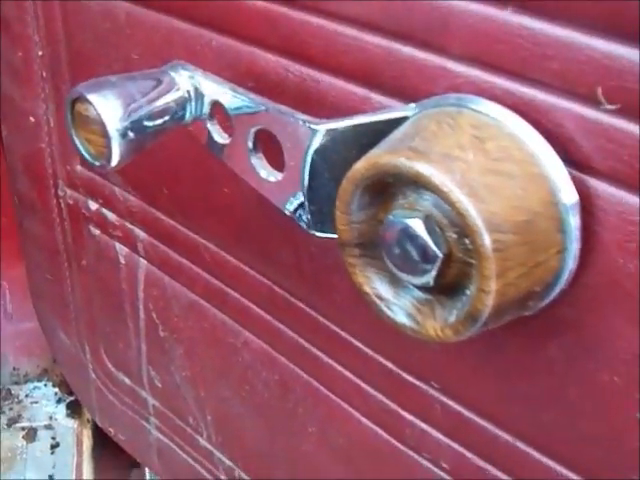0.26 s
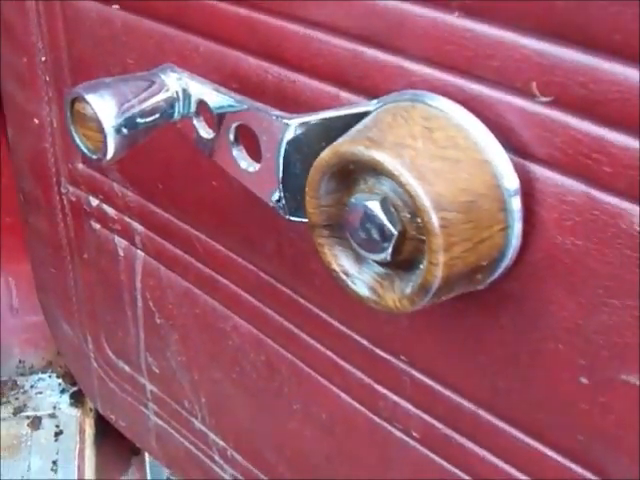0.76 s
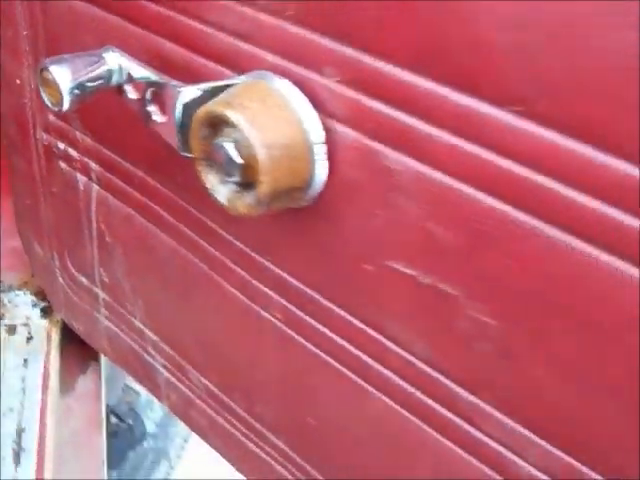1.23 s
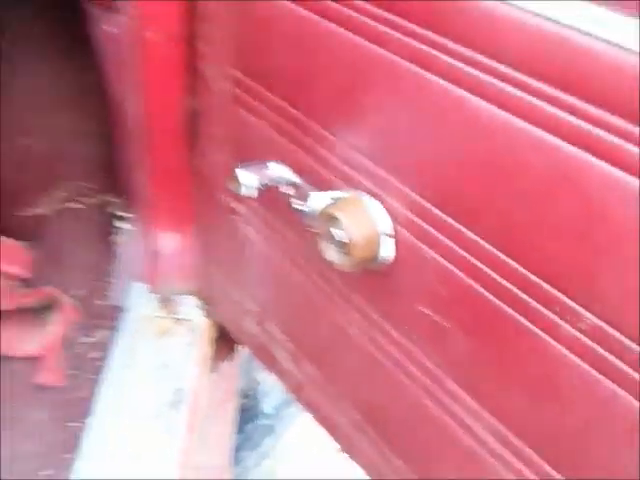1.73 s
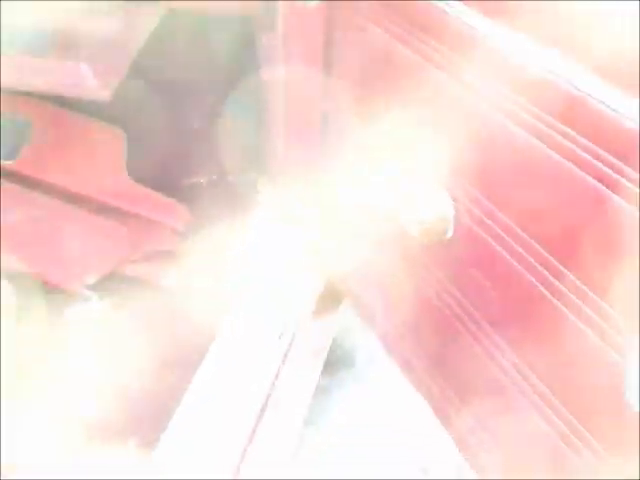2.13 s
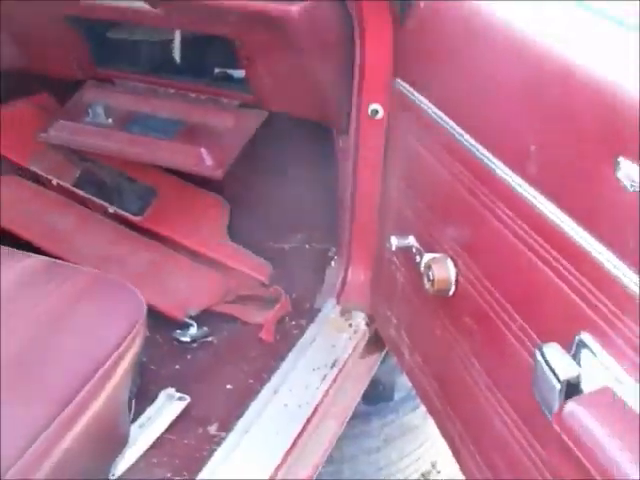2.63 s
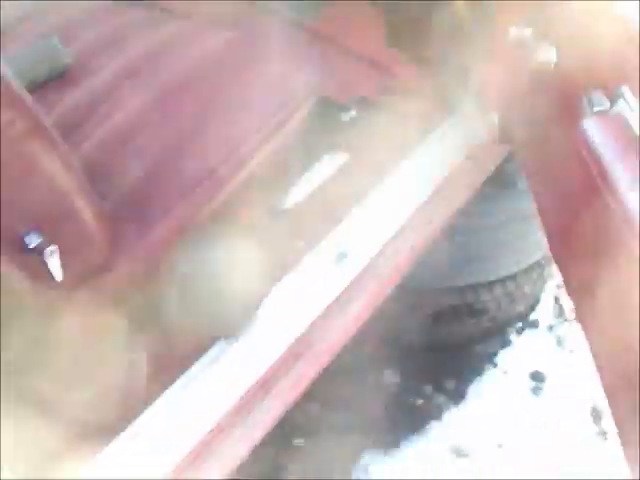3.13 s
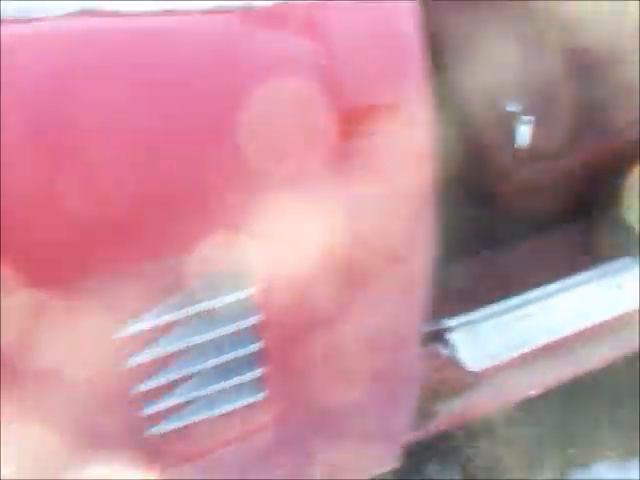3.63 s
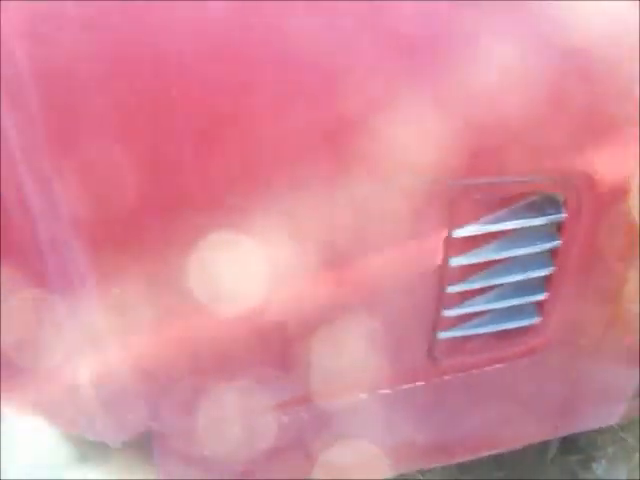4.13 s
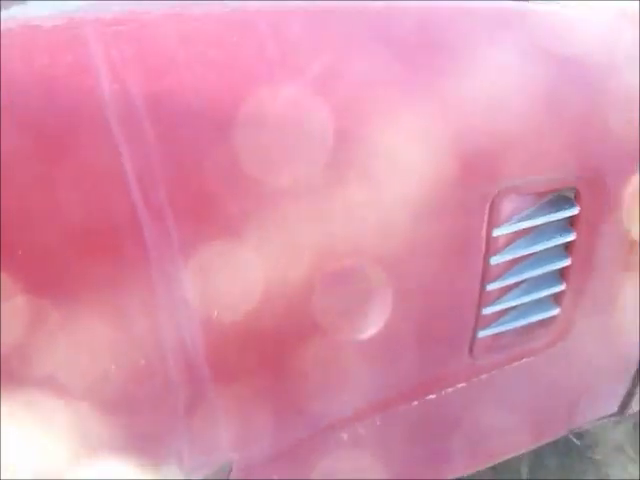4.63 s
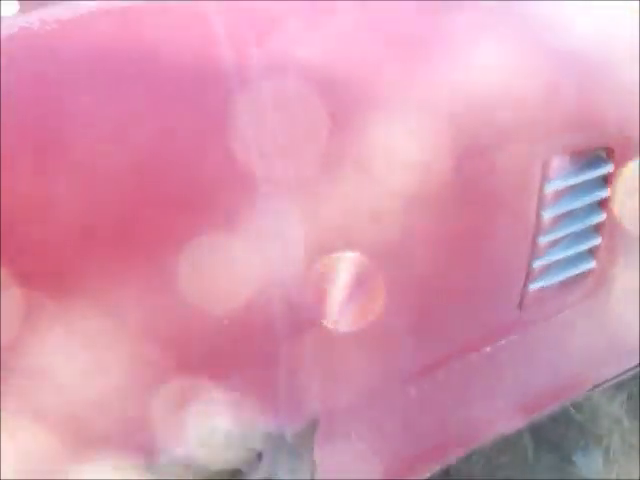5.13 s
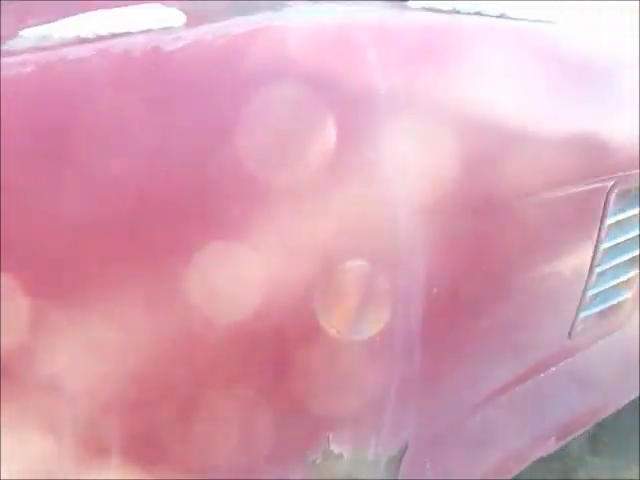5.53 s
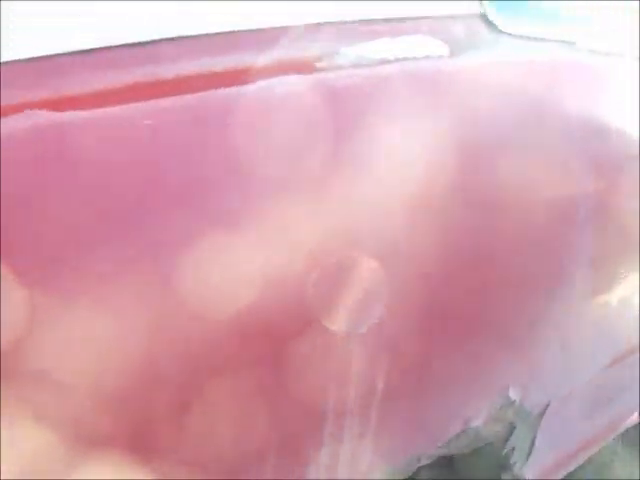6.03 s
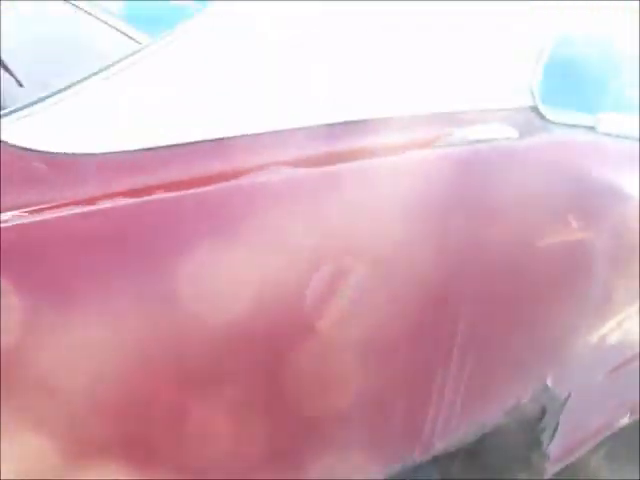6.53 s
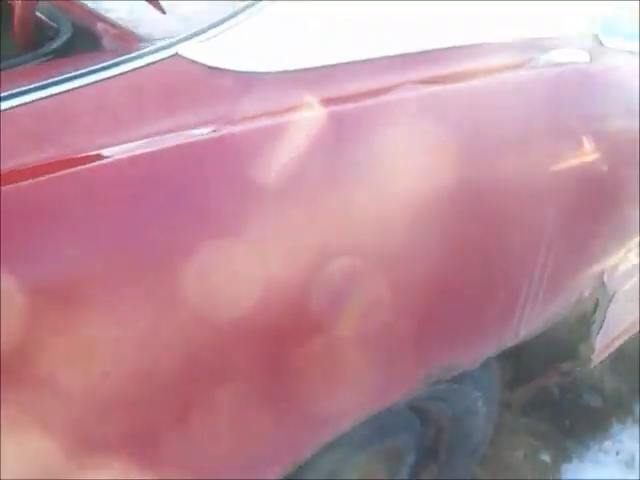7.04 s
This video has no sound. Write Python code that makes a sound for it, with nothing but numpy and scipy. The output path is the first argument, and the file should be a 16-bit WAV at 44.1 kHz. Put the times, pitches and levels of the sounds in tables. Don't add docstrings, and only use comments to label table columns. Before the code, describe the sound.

Close handling rumble and soft knuckle raps, then a sharp latch crack and two heavy metallic door clunks, then grass rustle, ticks and thuds.

```python
import sys
import numpy as np
from scipy import signal
from scipy.fft import rfft, irfft
from scipy.io import wavfile
from scipy.ndimage import uniform_filter1d

SR = 44100
rng = np.random.default_rng(int(sys.argv[2]) if len(sys.argv) > 2 else 0)


def boost(x):
    u = np.asarray(x, float) / 20
    return 10 ** u


def generate_wav(signal):
    frames = np.transpose(np.atleast_2d(signal))
    scaled = np.clip(frames, -1, 1) * 32767
    pcm = np.round(scaled).astype(np.int16)
    wavfile.write(sys.argv[1], SR, pcm)


N = 320882
TIME = np.arange(N) / SR

# f/Hz, level/dB, t60/s
LATCH_MODES = [(337, 4.5, 0.121), (505, -14, .08), (680.5, 5.5, 0.15), (937, -4, 0.11), (988, 10.5, 0.069),
               (1190, -12, 0.078), (1267.6, -5.5, 0.12), (1336, -16, 0.057), (1460, -3, 0.099),
               (1556, -6, 0.1), (1765, 1.5, 0.08), (3380, -7.5, 0.052), (5140, -8, 0.069),
               (8660, -13, 0.032)]
EDGE_MODES = [(95.3, -13, 0.26), (222.4, -17.5, 0.27), (337.8, 8, 0.11), (367.2, -12, 0.22),
              (333, -10, 0.36), (416, -13, 0.29), (491, -9.5, 0.15), (676, -37, 0.094), (870, -10, 0.11),
              (1080, -7.5, .08), (1298, -3.5, 0.041), (1650, -6.5, 0.077), (1900, -35, .05),
              (2380, -31, 0.075)]
SEAT_MODES = [(100.4, -6.5, 0.345), (250, -14, 0.13), (289.4, -8.5, 0.097), (337, -13, 0.182),
              (624, -0.5, 0.082), (862, -5, 0.14), (1002, 4.5, 0.06), (1430, -9.5, 0.082),
              (1724, -9, 0.077), (1879, -14, 0.07), (3270, -8, 0.066), (3840, -7, 0.066)]
# f/Hz, spectral level/dB per Hz
CRACK_SPECTRA = [
    [(100, -21), (300, -15), (900, -9), (1500, -12), (2400, -23.5), (5500, -18.5), (8000, -24),
     (13800, -24.5), (15500, -39)],
    [(100, -6), (250, -5), (500, -6), (1100, -7.5), (1700, -18.5), (3400, -18), (6000, -31), (13000, -45),
     (15500, -60.5)],
    [(100, -8.5), (300, -8), (700, -11.5), (1500, -17), (3700, -16), (8600, -24), (12500, -19),
     (14300, -16.5), (15500, -31)],
]
# t/s, ring level/dB, crack level/dB, contact time/s, crack t60/s
LATCH_BLOWS = [
    (3.7272, -17, -11.5, 0.0027, 0.088),
    (3.7515, -25, -26, 0.00086, 0.027),
]
EDGE_BLOWS = [
    (3.9084, -27.5, -23.5, 0.00306, 0.028),
    (3.9124, -13.5, -15, 0.00042, 0.07),
    (3.934, -28.5, -34, .002, 0.03),
    (3.974, -34, -49, 0.005, 0.065),
    (4.523, -31, -41, .003, .03),
    (4.538, -24.5, -38, 0.004, .03),
    (4.701, -49, -44, 0.0036, 0.04),
]
SEAT_BLOWS = [(4.5003, -26.5, -23.5, 0.00089, 0.024), (4.5027, -17, -16, 0.001, 0.04),
              (4.512, -28, -20, .002, .03), (4.527, -24.5, -15.5, 0.0028, 0.035),
              (4.533, -28, -18, 0.0013, 0.034), (4.555, -34, -40, .003, .05),
              (4.568, -38, -29, 0.003, 0.07), (4.579, -41, -31.5, 0.0019, 0.074),
              (4.591, -41, -27, 0.0014, 0.029), (4.607, -47, -45.5, .003, 0.04),
              (4.628, -38.5, -44, 0.0016, 0.05), (4.65, -48, -45, .002, 0.055)]
DAMPING_SLOPES = (0.39, 0.43, 0.35)
BLOOMS = (.6, .1, .3)
OCTAVE_EDGES = (60, 250, 500, 1000, 2000, 4000, 8000, 16000)
# t/s, f/Hz, level/dB, t60/s
HINGE_SWAY = [
    (4.7, 24, -28, 0.71),
    (7.1, 45, -44, 0.42),
    (3.9, 38, -32, 0.73),
]
# t/s, gain level/dB
LIMITER_GAIN = [(0, 0), (3.744, 0), (3.748, -3), (3.88, -3), (3.9, 0.5), (3.944, 0), (3.95, -3), (4.3, -2),
                (4.4, 0), (7.28, -1)]

# t/s, peak level/dB, f/Hz, t60/s
KNUCKLE_RAPS = [
    (0.327, -38, 301, 0.018),
    (0.336, -27, 278, 0.032),
    (0.344, -35, 440, 0.1),
    (0.369, -39, 410, 0.023),
    (2.758, -38, 487, 0.034),
    (2.782, -31, 332, 0.011),
    (5.151, -35, 734, 0.015),
    (5.471, -33.5, 500, 0.016),
    (6.335, -28, 306, 0.011),
    (6.908, -41.5, 394, 0.034),
]
# t/s, peak level/dB, f/Hz, t60/s
FINGER_THUDS = [(2.7305, -40, 900, 0.015), (2.764, -36.5, 1190, 0.022), (3.597, -22, 530, 0.014),
                (3.649, -30, 410, 0.021), (4.395, -39.5, 870, 0.033), (4.786, -37.5, 328, 0.026),
                (5.303, -39, 303, 0.028), (5.611, -38.5, 960, 0.025), (6.074, -48.5, 726, 0.021),
                (6.232, -46, 608, 0.022), (6.261, -40, 705, 0.018), (6.263, -44, 1700, 0.018),
                (6.324, -30.5, 304, 0.035), (6.253, -45, 1300, .02), (6.268, -42, 800, .014),
                (6.333, -40, 1500, .02), (6.793, -38.5, 440, 0.04), (6.839, -44, 900, 0.012),
                (7.049, -46, 322, 0.0286)]
# t/s, peak level/dB, f/Hz, t60/s
FINGER_PATS = [
    (.3415, -33, 624, 0.028),
    (4.4105, -23.5, 1030, 0.031),
    (6.5705, -23, 886, 0.017),
    (6.574, -28.5, 600, 0.023),
]
# t/s, peak level/dB, treble level/dB re peak
DRY_TICKS = [(1.6444, -48, 3), (1.6944, -42, -1), (1.913, -41, -11), (2.783, -41, -9), (4.0896, -43, -20),
             (4.278, -47, -6), (4.3923, -34, -5), (4.7888, -43, -5), (5.055, -46.5, 2.5),
             (5.246, -43, -18.5), (5.476, -41.5, -12.5), (5.532, -50.5, -14), (5.8857, -55, 12.5),
             (5.9244, -55, 6), (5.9564, -54, -13), (6.076, -44, -7), (6.2072, -43, -7), (6.263, -43, -10),
             (6.3255, -28.5, -8)]
# t/s, peak level/dB, treble level/dB re peak
NAIL_CATCHES = [(2.1864, -48, 7), (2.1964, -46, 0.5), (2.2293, -38, -8.5), (2.2384, -33, -12),
                (3.335, -29, -6), (3.343, -32, -7), (3.437, -27, 3), (3.4412, -22, 4), (3.448, -21, 1),
                (3.4595, -26, 0), (3.4632, -23.5, 2.5), (3.4725, -36.5, 2.5), (5.3046, -36, -7.5),
                (5.3114, -41, 2.5), (5.602, -41, 2), (5.6093, -44, -10), (5.6325, -40, -6),
                (5.6454, -40, -17), (6.796, -36, -12.5), (6.806, -35, -6)]
# t/s, f/Hz, level/dB, t60/s
METAL_TINK = (2.4115, 8700, -47, .05)
# t/s, peak level/dB, f/Hz (negative for a pull)
FIBRE_SNAPS = [(4.279, -40, 4200), (4.394, -31, -6000), (4.4545, -40, 3200), (4.613, -30.5, 1500),
               (4.6282, -26, 1100), (4.645, -39, 1500), (4.6525, -36, 1690), (4.706, -37, 1500),
               (4.748, -44, 1201), (4.76, -42, 1210), (5.5858, -42, 1300), (5.5975, -37, 900),
               (5.6038, -35, 1500), (5.606, -31, 1980), (5.6098, -39, 1800), (5.6152, -42, 1510),
               (5.6178, -32, 1700), (5.634, -29.5, 2000), (5.641, -39.5, 2500), (5.643, -36, 2200),
               (5.6476, -37, 3200), (6.7965, -29, 2000), (6.8065, -40, 1800), (6.841, -40, 1900),
               (6.911, -37, 2000), (6.3257, -24, -2000), (.3435, -38, 1500), (.353, -42, 2000),
               (3.5995, -30, 1300), (3.6515, -36, 1500), (6.572, -38, 1800), (6.799, -38, 1400),
               (6.802, -40, 2500), (6.81, -41, 2500), (5.304, -42, 1200), (5.473, -42, 1200),
               (2.7313, -30.5, -800), (2.765, -33, -1500), (2.782, -33, -500), (3.4425, -22, 3000),
               (3.4489, -23, 2800), (3.4644, -23, 3500), (4.788, -39, 1200), (1.915, -32, -1500)]
# t/s, signed amplitude, width/s
CASE_BUMPS = [(4.599, -0.11, 0.0027), (6.27, -.03, .003), (6.279, -.02, 0.0027), (6.288, -.025, .002),
              (6.344, 0.046, 0.003), (6.3497, -0.053, 0.0014), (6.356, -0.034, 0.0027),
              (6.379, 0.051, 0.0056), (6.541, -0.014, .004), (6.554, -0.042, 0.0043), (6.563, 0.03, .004),
              (7.052, -.02, 0.0017), (7.098, -0.022, 0.0015), (7.201, -0.033, 0.0039),
              (4.382, -0.014, .006), (6.963, -0.09, 0.0025), (6.970, 0.065, 0.0026), (6.98, -0.053, 0.0026),
              (7.004, -0.021, 0.0092), (2.949, -0.013, 0.0046)]

# peak t/s, rise/s per 20 dB, fall/s per 20 dB, level/dB, treble level/dB re level
CLOTH_STROKES = [(1.62, .25, 0.4, -50.5, -5), (1.735, .01, 0.1373, -41.5, -3), (1.768, .06, 0.1, -37, -10),
                 (1.825, .1, 0.0978, -43.5, -1), (1.864, .012, 0.08, -37.5, -10),
                 (1.885, .05, 0.02, -41.5, -12.5), (1.915, .1, -0.03, -44, -16.5),
                 (2.612, .015, 0.1756, -47, -8), (2.665, .1, 0.0931, -46, -12), (2.8, .28, 0.04, -51.5, -5),
                 (2.92, .1, 0.33, -52, -8), (5.248, 0.03, -0.07, -60, 15.5), (5.477, -0.02, 0.14, -57, 3),
                 (5.607, 0, -0.0647, -42.5, 1), (5.648, 0.1, -0.1, -42, -8), (5.82, 1, 0.1, -67, 6),
                 (6.335, -0.22, 0.1, -55, -4)]
GRASS_BRUSHES = [(1.98, .1, 0.14, -64, 8), (2.23, .045, 0, -42.5, -1), (3.337, .004, 0.08, -45.5, 6),
                 (3.38, .1, 0.4, -59, -1), (3.43, .08, 0.25, -49.5, -18), (4.09, 0, 0.08, -60.5, -7),
                 (4.28, -0.1, 0.3, -52.5, 1), (4.33, -0.02, 0.24, -52, -0.5),
                 (4.495, 0.04, -0.02, -50.5, -8.5), (4.64, 0.02, .12, -55, -8),
                 (4.545, -0.0167, 0.0624, -34.5, -7.5), (5.0, 0.09, 0.1, -59, 2.5),
                 (5.55, 0.06, 0.09, -55.5, 5), (6.18, -0.4, 0.3, -59.5, 3), (6.26, -0.2, 0.23, -55, -7),
                 (6.97, 0.2, 0.4, -57.5, -1.5), (7.2, 0.7, 1.07, -65.5, 3)]
PALM_SLIDES = [
    (3.603, .005, 0.32, -50.5, -5),
    (3.66, .1, 0.32, -50, -7.5),
    (4.61, 0.13, 0.21, -50.5, -15),
    (4.8, 0.5, 0.1, -63, -3),
    (6.795, 0.14, 0.33, -59.5, -8),
]
# f/Hz, bandwidth/Hz, level/dB
CLOTH_RESONANCES = [
    (1750, 600, -2),
    (3100, 800, -8),
]
# peak t/s, rise/s per 20 dB, fall/s per 20 dB, level/dB, f/Hz
CLOTH_SQUEAKS = [(1.634, .02, 0, -53, 1700), (1.695, .03, 0, -53, 1610), (1.77, .06, .06, -45, 1840),
                 (1.785, .06, 0.05, -47, 3070), (1.808, .01, .05, -47, 1680),
                 (1.865, .015, 0.07, -46, 1920), (1.872, .03, .04, -48, 3970), (1.93, .03, .05, -54, 1950),
                 (2.613, .01, 0.1, -52, 1650), (2.645, .05, 0, -54, 1650), (2.665, .1, 0, -51, 4240),
                 (3.42, .1, .05, -56, 3300), (4.285, .01, .12, -51, 3730), (4.283, .01, .1, -55, 6220)]

# t/s, tremor level/dB
GRIP_TREMOR = [(0, -47.5), (.75, -47.5), (2, -48), (3.45, -45.5), (3.9, -48), (4.28, -53.5), (4.9, -56),
               (6.08, -57), (6.3, -46), (6.85, -52.5), (7.28, -51.5)]
# peak t/s, rise/s per 20 dB, fall/s per 20 dB, deep level/dB, upper level/dB re deep
ARM_JOLTS = [(1.01, .3, 1, -50, -18), (2.11, .15, 0.11, -45.5, -8), (3.54, .15, 0.1, -34.5, -9.5),
             (3.75, .03, 0.16, -46, 11), (3.81, .09, 0.09, -30, -12), (3.93, 0.02, 0.2, -41.5, 12),
             (3.99, 0.1048, 0.2, -24, -19), (4.23, .25, 0.03, -36, -15), (4.52, 0.08, 0.28, -27, -8),
             (4.62, 0.16, 0.1384, -31, 2.5), (4.85, 0.51, 0.15, -37, -6.5), (5.1, -0.5, 0.2759, -51, -9),
             (5.35, 1, 0.6, -53, -4.5), (5.75, 0.1, 0.3, -49, -14), (6.24, 0.18, 0.25, -39, -9),
             (6.36, 0.06, .5, -40.5, -7), (6.57, 0.07, 0.25, -37.5, 0), (6.97, 0.1, 0.1, -35, -7),
             (7.07, 0.08, 0.2, -45.5, 4), (7.2, 0.3, 0.08, -43, -1.5)]
# f/Hz, spectral level/dB per Hz
RUMBLE_SKIRT = [(35, -14.5), (60, -1), (100, -1.5), (170, -9.5), (260, -14.5), (500, -44.5)]
# f/Hz, spectral level/dB per Hz
YARD_SPECTRUM = [(88, -36), (150, -4.5), (217, -3), (296, -4), (388, -5), (1170, -14), (2360, -19),
                 (2650, -19.5), (3620, -19.5), (4560, -18.5), (5130, -23), (7130, -23), (13500, -26.5),
                 (14300, -24), (15500, -81.5)]
# f/Hz, bandwidth/Hz, level/dB
INSECT_BAND = (4575, 406, -70)
# t/s, quick level/dB, slow level/dB
GAIN_DUCKS = [
    (3.76, -7, -2),
    (3.92, -5, -1.5),
    (4.5, -11, -5.5),
]
# t/s, amplitude
INPUT_CEILING = [(0, .5), (3.85, .5), (3.88, .31), (4.3, .31), (4.4, .27), (7.28, .27)]


def curve(rows):
    t, *columns = np.transpose(rows)
    return [np.interp(TIME, t, column) for column in columns]


def unit(x):
    return x / np.sqrt(np.mean(x ** 2))


def colour(points):
    hz, db = np.transpose(points)
    f = np.arange(N // 2 + 1) * SR / N + 1
    weight = boost(np.interp(np.log(f), np.log(hz), db))
    return unit(irfft(rfft(rng.standard_normal(N)) * weight, N))


def bandpass(lo_hz, hi_hz):
    return signal.butter(2, [lo_hz, hi_hz], "bandpass", fs=SR, output="sos")


def band(x, lo_hz, hi_hz):
    return unit(signal.sosfilt(bandpass(lo_hz, hi_hz), x))


def walk(rate_hz):
    k = int(SR / rate_hz)
    return unit(uniform_filter1d(uniform_filter1d(rng.standard_normal(N), k), k))


def fade(t60, rise):
    t60 = max(t60, .002)
    t = np.arange(int(SR * t60 * 1.1)) / SR
    return (1 - np.exp(-t / rise)) * boost(-60 * t / t60)


def ring(hz, t60, rise=0.0003):
    env = fade(t60, rise)
    return env * np.sin(2 * np.pi * hz * np.arange(len(env)) / SR)


def add(out, s, x):
    i = int(s * SR)
    out[i:i + len(x)] += x[:N - i]


def swell(rise, fall, db):
    rise, fall = max(rise, 1e-6), max(fall, 1e-6)
    t = np.arange(-int(2.5 * rise * SR), int(2.5 * fall * SR)) / SR
    return t, boost(db + 20 * np.minimum(t / rise, -t / fall))


def swells(rows, extra_db):
    plain, tinted = np.zeros(N), np.zeros(N)
    for s, rise, fall, db, tint_db in rows:
        t, envelope = swell(max(rise, .002), max(fall, .002), db)
        power = envelope ** 2
        add(plain, s + t[0], power)
        add(tinted, s + t[0], power * boost(2 * tint_db))
    return np.array([plain, tinted, plain * boost(2 * extra_db)])


def door():
    out, wobble = np.zeros(N), walk(80)
    cracks = [colour(spectrum) for spectrum in CRACK_SPECTRA]
    octaves = [(np.sqrt(lo * hi), bandpass(lo, hi)) for lo, hi in zip(OCTAVE_EDGES, OCTAVE_EDGES[1:])]
    parts = zip((LATCH_BLOWS, EDGE_BLOWS, SEAT_BLOWS), (LATCH_MODES, EDGE_MODES, SEAT_MODES),
                cracks, DAMPING_SLOPES, BLOOMS)
    for blows, modes, crack, slope, bloom in parts:
        for s, ring_db, crack_db, contact, t60 in blows:
            start = int(s * SR)
            for m, (hz, db, decay) in enumerate(modes):
                mode = ring(hz, decay, contact * (hz / 1000) ** -bloom)
                waver = 2.5 * wobble[start + m * SR // 20:][:len(mode)]
                add(out, s, boost(ring_db + db + waver) * mode * (-1) ** m)
            for m, (hz, octave) in enumerate(octaves):
                env = fade(t60 * (hz / 5000) ** -slope, contact)
                excerpt = np.roll(crack, 9000 * m - start)[:len(env)]
                noise = signal.sosfilt(octave, excerpt)
                add(out, s, boost(crack_db) * env / env.max() * noise)
    for s, hz, db, t60 in HINGE_SWAY:
        add(out, s, boost(db) * ring(hz, t60, 0.027))
    return out * boost(curve(LIMITER_GAIN)[0])


def knocks():
    out, dull = np.zeros(N), rng.standard_normal(N)
    lag_s = 0.001449
    for rows, noisy in ((KNUCKLE_RAPS, 0.32), (FINGER_THUDS, 0.75)):
        for s, db, hz, t60 in rows:
            i, env = int(s * SR), fade(1.98 * t60, 0.00028)
            skirt = band(dull[i:i + len(env)], .6 * hz, 1.9 * hz)
            add(out, s + lag_s, boost(db) * ring(hz, t60, 0.00014))
            add(out, s + lag_s, boost(db + 1.5) * noisy * env * skirt)
    return out


def pats():
    out = np.zeros(N)
    for s, db, hz, t60 in FINGER_PATS:
        add(out, s, boost(db) * ring(hz, t60, rise=0.0022))
    return out


def ticks():
    out, grit = np.zeros(N), rng.standard_normal(N)
    mid, treble = band(grit, 1400, 6500), band(grit[::-1], 5500, 15000)
    lag_s = 0.00075
    for rows, t60 in ((DRY_TICKS, 0.024), (NAIL_CATCHES, 0.013)):
        env = fade(t60, 0.0005)
        for s, db, treble_db in rows:
            i = int(s * SR)
            burst = (mid + boost(treble_db) * treble)[i:i + len(env)]
            add(out, s + lag_s, boost(db - 4.5) * env * burst)
    s, hz, db, t60 = METAL_TINK
    add(out, s, boost(db) * ring(hz, t60))
    return out


def snaps():
    out = np.zeros(N)
    for s, db, hz in FIBRE_SNAPS:
        add(out, s, boost(db + 2) * ring(hz, 3.5 / abs(hz), .00003))
        add(out, s, boost(db) * 0.43 * ring(3.24 * hz, 0.0018, .00003))
    return out


def bumps():
    out = np.zeros(N)
    for s, size, width in CASE_BUMPS:
        out += size * np.exp(-((TIME - s) / width) ** 2)
    return out


def rustle():
    grains = rng.standard_normal((3, N)) * boost(1.6 * walk(600) + 1.4 * walk(44.7))
    broad = band(grains[0], 1000, 5800)
    resonant = sum(boost(db) * band(grains[2], hz - w / 2, hz + w / 2) for hz, w, db in CLOTH_RESONANCES)
    mid = unit(resonant + 0.84 * broad)
    treble, low = band(grains[1], 5000, 13500), band(grains[1], 300, 1200)
    power = swells(CLOTH_STROKES, -6.5) + swells(GRASS_BRUSHES, 2) + swells(PALM_SLIDES, 9)
    return boost(-3) * (np.sqrt(power) * [mid, treble, low]).sum(axis=0)


def squeaks():
    out, noise = np.zeros(N), rng.standard_normal(N)
    half_width = .06
    for s, rise, fall, db, hz in CLOTH_SQUEAKS:
        t, envelope = swell(rise, fall, db)
        tone = band(noise[int(s * SR):][:len(t)], hz * (1 - half_width), hz * (1 + half_width))
        add(out, s + t[0], envelope * tone)
    return out


def rumble():
    upper_re_deep_db = np.array([[0], [-2]])
    steady = boost(curve(GRIP_TREMOR)[0] + upper_re_deep_db)
    env = np.sqrt(steady ** 2 + swells(ARM_JOLTS, 0)[:2])
    deep = band(band(rng.standard_normal(N), 21.0, 45.0), 14.6, 52) * boost(1.6 * walk(8.3))
    upper = colour(RUMBLE_SKIRT) * boost(3.2 * walk(11.3))
    return boost(-2) * (env[0] * deep + boost(-1.34) * env[1] * upper)


def gain_db():
    rest_db, creep_db_per_s = 3, 0.61
    duck_s, quick_s, slow_s = 0.037, 0.18, 3.4
    db = rest_db + creep_db_per_s * np.minimum(TIME, GAIN_DUCKS[0][0])
    for s, quick_db, slow_db in GAIN_DUCKS:
        t = np.maximum(TIME - s, 0)
        recovery = quick_db * np.exp(-t / quick_s) + slow_db * np.exp(-t / slow_s)
        db += (1 - np.exp(-t / duck_s)) * recovery
    return db


def yard():
    hz, width, db = INSECT_BAND
    insects = boost(db + 1.7 * walk(26)) * band(rng.standard_normal(N), hz - width / 2, hz + width / 2)
    air = boost(-56.5 + 0.27 * walk(2.7)) * colour(YARD_SPECTRUM)
    return boost(gain_db()) * (air + insects)


def scene():
    fingers = knocks() + pats() + ticks() + snaps() + bumps()
    return (door() + fingers + rustle() + squeaks() + rumble() + yard())[None]


def roll_off(x):
    return signal.sosfilt(signal.butter(12, 15770, fs=SR, output="sos"), x)


def record(dry):
    ceiling = curve(INPUT_CEILING)[0]
    saturated = np.clip(dry, -ceiling, ceiling)
    low_pass = signal.ellip(8, .2, 27, 13950, fs=SR, output="sos")
    mix = signal.sosfilt(low_pass, saturated)
    return roll_off(mix)


dry = scene()
out = record(dry)
generate_wav(out)
```